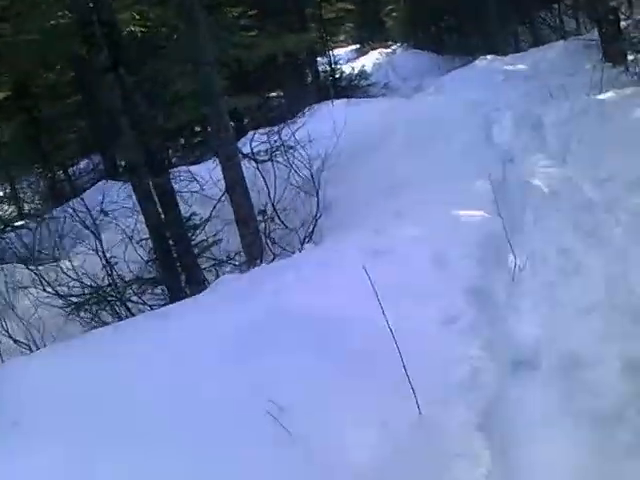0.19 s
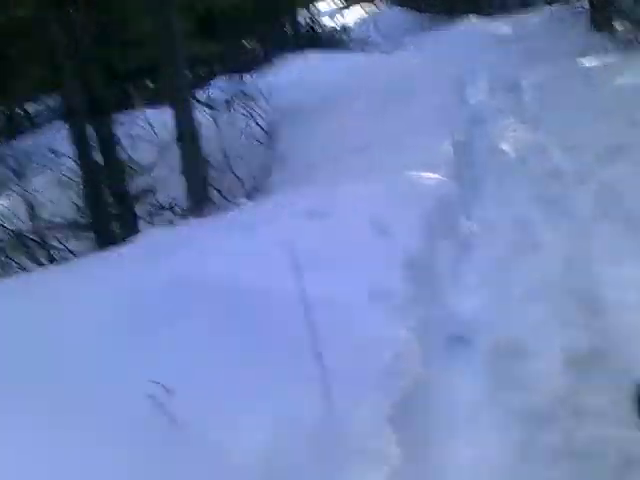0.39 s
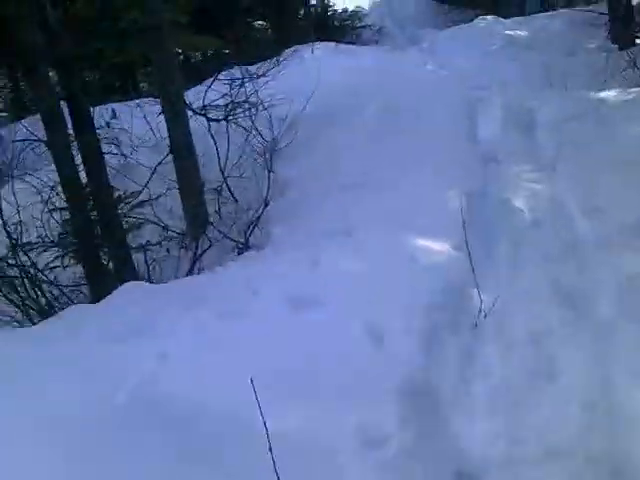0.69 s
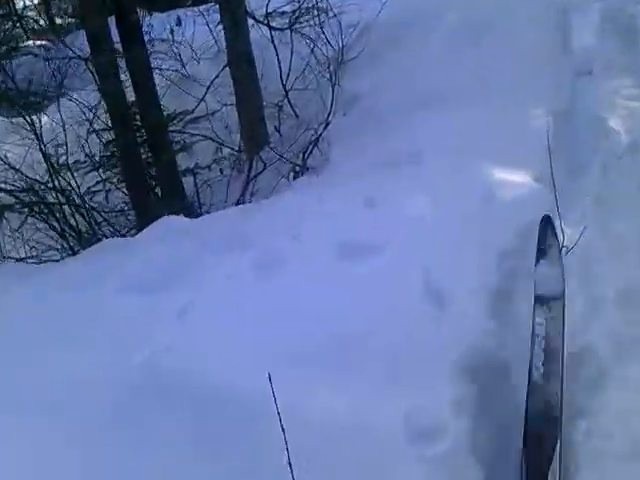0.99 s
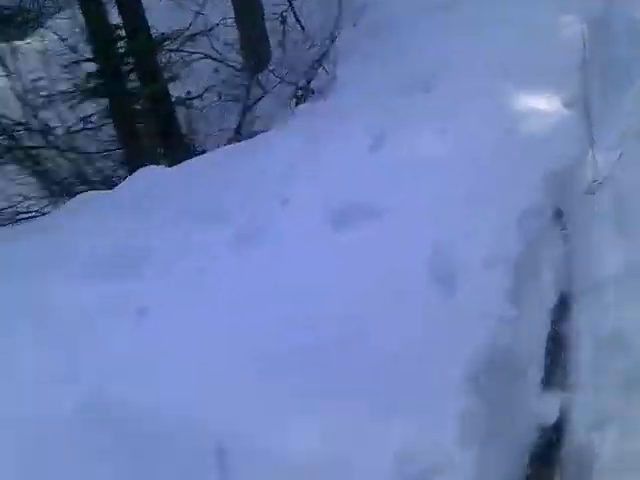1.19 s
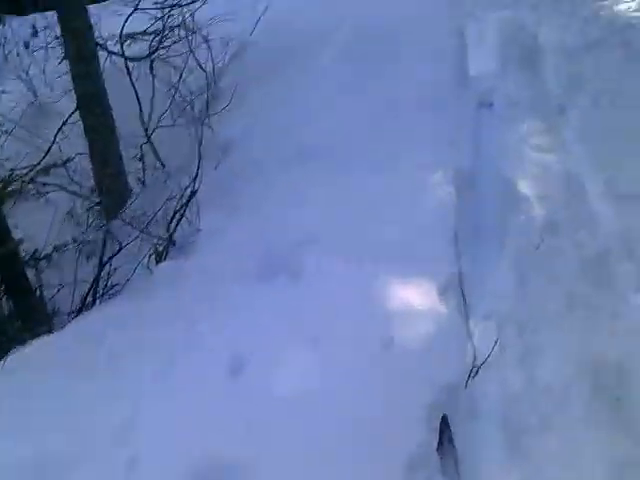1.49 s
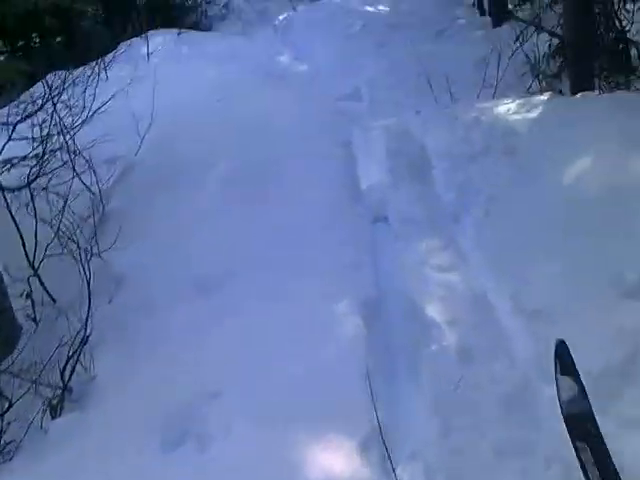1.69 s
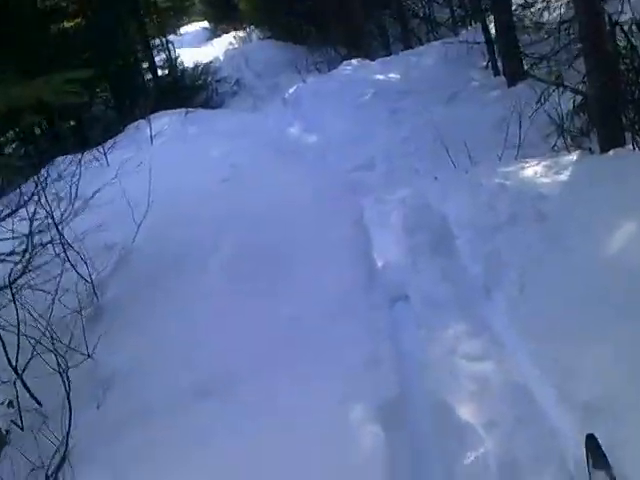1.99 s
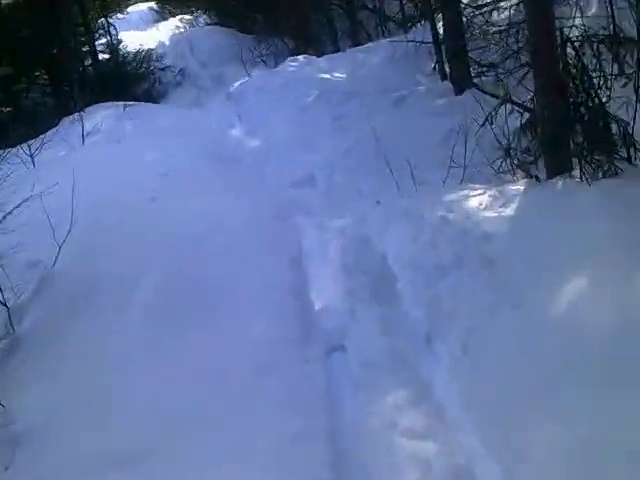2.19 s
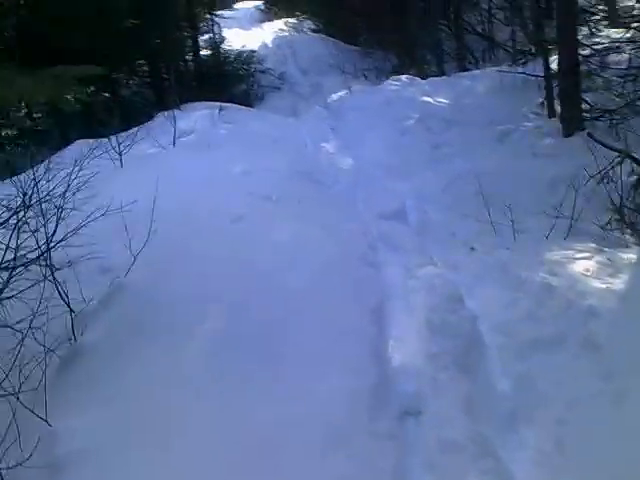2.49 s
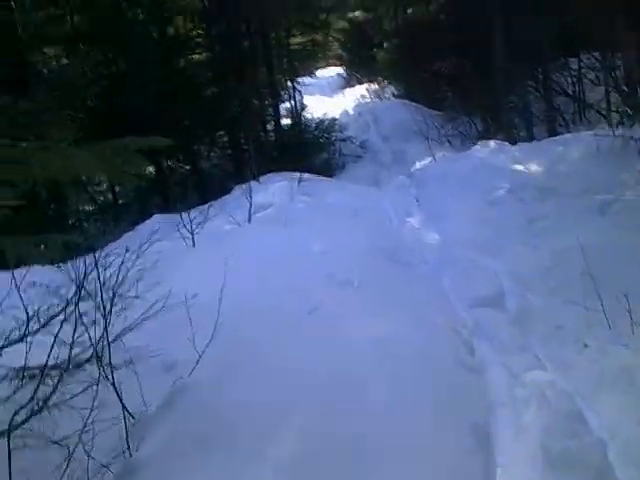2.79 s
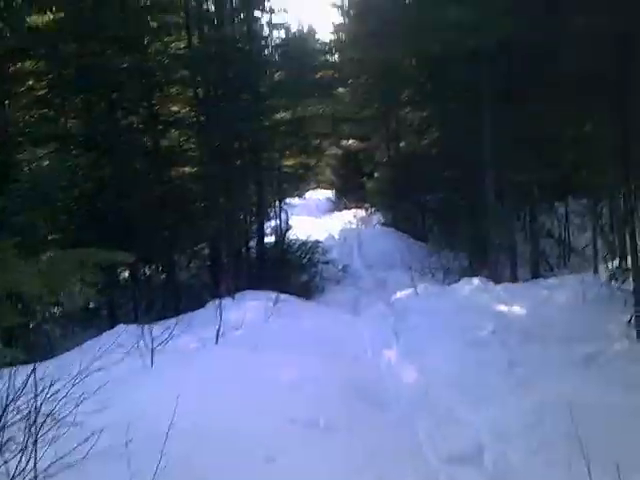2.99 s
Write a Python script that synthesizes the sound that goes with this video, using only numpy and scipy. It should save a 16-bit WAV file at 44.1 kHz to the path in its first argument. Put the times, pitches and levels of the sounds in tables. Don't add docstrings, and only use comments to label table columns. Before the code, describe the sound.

A skier strides through soft snow: hard hollow knocks early, quieter crumbling and a few taps midway, cracks near two seconds, then the hardest knock near the end; dry, close, muffled body-worn microphone outdoors.

```python
import sys
import numpy as np
from scipy import signal
from scipy.fft import rfft, irfft
from scipy.io import wavfile
from scipy.ndimage import uniform_filter1d, minimum_filter1d

SR = 44100
rng = np.random.default_rng(int(sys.argv[2]) if len(sys.argv) > 2 else 0)


def waveform_to_disk(signal):
    frames = np.transpose(np.atleast_2d(signal))
    scaled = np.clip(frames, -1, 1) * 32767
    samples = np.round(scaled).astype(np.int16)
    wavfile.write(sys.argv[1], SR, samples)


def elevation(decibels):
    levels = np.asarray(decibels, float)
    return 10 ** (levels / 20)


N = 136710
T = np.arange(N) / SR

# freq_hz, gain_db
CASE_GAIN = [(150, -20.5), (420, -5), (800, -0.5), (1300, -3), (2400, -13.5), (3500, -37.5), (4600, -56),
             (5500, -100)]
# freq_hz, width_hz, gain_db
CASE_RINGS = [(509, 140, -1.5), (659, 34, 5.5), (800, 67, -0.5), (904, 60, 1.5), (1092, 88, 4),
              (1233, 70, 1.5), (1584, 600, -7), (2170, 82, -19.5), (3330, 270, 10.5)]
# time_s, level_db
SWAY_LEVEL = [(0.0, -30.5), (0.17, -42), (0.21, -30), (0.28, -38), (0.31, -27.5), (0.37, -25.5),
              (0.59, -29), (0.65, -39.5), (1.14, -29), (1.18, -17.5), (1.33, -34.5), (1.41, -34),
              (1.5, -39.5), (2.19, -28.5), (2.62, -34), (2.86, -29), (2.94, -31.5), (3.1, -33.5)]
# freq_hz, gain_db
SWAY_COLOUR = [(4, -2), (12, -1.5), (30, -11), (60, -19.5), (120, -25), (250, -31.5), (500, -33.5),
               (2500, -120)]
# start_s, peak_db, pitch_hz
JOLTS = [(0.305, -19.5, 109.7), (.319, -15, 122), (.399, -18, 131.2), (0.749, -31, 108.4), (.8, -29, 150),
         (1.029, -24.5, 151), (1.171, -18.5, 197.5), (1.207, -18, 86.6), (1.22, -23.5, 108.8),
         (1.34, -26.5, 151.8), (2.029, -26.5, 109.2), (2.549, -27, 197), (2.816, -15, 130),
         (1.257, -19, 130), (2.851, -25, 70), (1.317, -23, 22)]
# time_s, level_db
GLIDE_LEVEL = [(0.0, -47.5), (0.28, -38.5), (0.4, -33), (0.44, -39.5), (0.55, -45.5), (0.72, -43.5),
               (1.08, -36.5), (1.5, -40.5), (2.11, -40.5), (2.19, -44.5), (2.66, -33), (3.1, -37.5)]
# start_s, length_s, level_db
RUSTLES = [
    (0.342, 0.0067, -19.5),
    (1.2, 0.013, -33),
    (2.101, 0.026, -27),
    (2.16, 0.024, -27.5),
    (2.55, 0.02, -28.5),
    (2.674, 0.0032, -23),
    (2.709, 0.0039, -28.5),
    (2.749, 0.0061, -24.5),
    (2.757, 0.0065, -17.5),
]
# start_s, length_s, level_db, treble_db
CRUNCHES = [(-.01, 0.036, -25, 3.5), (0.336, 0.049, -21.5, -3), (0.437, 0.04, -16.5, -3),
            (0.484, 0.06, -31, 7), (0.542, 0.032, -35, 1), (0.691, 0.056, -38, 9.5),
            (0.765, 0.049, -34.5, 12), (0.966, 0.011, -32.5, 5.5), (1.154, .085, -29.5, 1),
            (1.257, 0.027, -52, 11), (1.407, 0.052, -32, 15.5), (1.505, 0.048, -40, 17),
            (1.816, 0.039, -34.5, -4), (1.845, 0.047, -29.5, -7), (1.925, 0.056, -19.5, 3.5),
            (2.106, 0.058, -32, 3), (2.221, 0.018, -33.5, 1.5), (2.254, 0.031, -42, 23),
            (2.3, 0.015, -34.5, 15), (2.426, 0.067, -28.5, -14), (2.529, 0.018, -35, -3),
            (2.55, 0.057, -32.5, -5.5), (2.675, 0.021, -35.5, 16), (2.744, 0.057, -30.5, 0.5),
            (2.356, 0.054, -35, -7), (2.898, 0.058, -32.5, 0.5), (3.003, 0.03, -34.5, -2.5),
            (0.883, 0.064, -43, 8)]
# start_s, peak_db, pitch_hz
LUMPS = [(0.088, -28, 1240), (0.616, -31, 1090), (0.687, -29, 1030), (0.701, -34, 1050), (0.715, -22, 850),
         (0.727, -29, 626), (0.745, -26, 790), (0.776, -20.5, 1430), (0.786, -37, 504),
         (0.796, -24.5, 1300), (0.804, -26, 611), (0.812, -18, 654), (0.857, -26, 850), (0.887, -24, 810),
         (0.911, -28, 744), (0.925, -27, 1200), (1.075, -30, 807), (1.335, -26, 517), (1.422, -27, 1140),
         (1.506, -25, 1410), (1.541, -44, 783), (1.808, -33, 1060), (1.82, -24.5, 659), (2.105, -27, 1110),
         (2.119, -24, 1190), (2.303, -22, 1320), (2.398, -27, 860), (2.434, -20.5, 1320),
         (2.762, -23, 1080), (2.988, -17.5, 1270), (3.034, -24, 1050)]
# start_s, peak_db, ring_hz, edge_db, snap_db
KNOCKS = [
    (.231, -10, 924, -13.5, -7),
    (.288, 1, 1062, 3, 3),
    (.3895, -6, 910, -9, -8.5),
    (.455, 5, 980, 1.5, 6),
    (.821, -14, 513, -5, -14),
    (1.970, -3, 481, -6.5, -7),
    (2.179, -9.5, 1016, -12, -10.5),
    (2.217, -3, 800, -10.5, -20),
    (2.23, -11, 1010, -2, -11),
    (2.817, 5.5, 1087, 5.5, 8),
]
# start_s, peak_db, ring_hz, edge_db, snap_db
TAPS = [
    (.474, 9.5, 916, -9.5, -9),
    (.960, -1.5, 1176, 1, -2.5),
    (1.2567, 4, 800, -17, -20),
    (2.622, -2, 916, -5, -15.5),
    (2.696, -5, 700, -10.5, -14.5),
]
# start_s, peak_db, ring_hz, edge_db, snap_db
MORE_KNOCKS = [(.255, -15.5, 900, -18, -19), (.365, -11.5, 900, -19, -5), (.396, -11.5, 983, -9, -15),
               (.436, -12.5, 900, -3, -9), (.492, -13, 711, -5, -7), (.506, -12, 960, -4.5, -4.5),
               (.588, -15.5, 766, -19, -16), (1.17, -11.5, 1125, -19, -6), (1.62, -23.5, 1190, -9, -8),
               (1.671, -20.5, 916, -5, -12), (1.777, -24.5, 1240, -15.5, -8), (1.859, -14, 885, -9.5, -15.5),
               (1.948, -14.5, 870, 0.5, -6), (1.955, -7, 896, -3.5, -1.5), (1.9749, -3.5, 668, -19, -7.5),
               (2.206, -18.5, 906, -1, -10), (2.365, -21, 960, -9, -10), (2.466, -16.5, 795, -4.5, -15),
               (2.52, -17, 1196, -17, -9.5), (3.006, -18.5, 700, -4.5, -13.5)]
# start_s, peak_db, ring_hz, edge_db, snap_db
REBOUNDS = [
    (.2936, -8, 650, -10, -12),
    (.4599, -3, 850, -14, -14),
    (.4797, -10, 1000, -14, -14),
    (.9671, -16, 900, -2, -12),
    (1.2596, -10, 485, -14, -25),
    (1.2632, -16, 1080, -12, -20),
    (2.8213, 4, 800, -4, -3),
]
# freq_hz, gain_db
EDGE_RINGS = [(1530, 1.5), (1950, 3.5), (2400, -1)]
# freq_hz, width_hz, gain_db
STRAP_RINGS = [(1180, 250, 0), (1800, 300, -5), (2350, 300, -4)]
PATCH_EDGES_HZ = [150, 560, 900, 1350, 1900, 2700, 6000]

LEAK_LO_HZ, LEAK_HI_HZ, LEAK_DB, AIR_DB = 6250, 7910, -47.5, -42
JOLT_CYCLES = 1.25
GLIDE_FLICKER_DB, GLIDE_TREBLE_DB, GLIDE_GRIT_DB = 2, 6, -14.5
PATCH_DB, PATCH_PER_S = 2, 28.6
CRUNCH_RISE_S, CRUNCH_FALL_S, CRUNCH_DB, CRUNCH_SWELL_DB = 0.0084, 0.011, -2.5, 1.5
GRAINS_PER_S, GRAIN_SPREAD_DB = 1500, 3
CREAK_START_S, CREAK_LENGTH_S, CREAK_SLIPS_PER_S, CREAK_DB = 0.9435, 0.0125, 585, -22.5
LUMP_CYCLES, LUMP_DB = 9.9, -5
CRUMBS_PER_S, CRUMB_DB, CRUMB_LO_HZ, CRUMB_HI_HZ = 600, -11.5, 603, 1770
KNOCK_T60_S, KNOCK_RATTLE_DB = 0.021, -5.5
TAP_T60_S, TAP_RATTLE_DB = 0.012, -11
MORE_KNOCK_T60_S, MORE_KNOCK_RATTLE_DB = 0.03, -4
REBOUND_T60_S, REBOUND_RATTLE_DB = 0.036, -18
EDGE_T60_S, RATTLE_T60_S, KNOCK_LAG_S = 0.013, 0.05, 0.0008
EDGE_DB, SNAP_DB, KNOCK_DB = 0.5, -0.5, 2.5
LIMIT_AT, LIMIT_S = 1.02, 0.0006


def unit(x):
    return x / np.sqrt(np.mean(x ** 2))


def band(x, hz, width_hz):
    return signal.lfilter(*signal.iirpeak(hz, hz / width_hz, fs=SR), x)


def between(x, lo_hz, hi_hz, order=5):
    return signal.sosfilt(signal.butter(order, [lo_hz, hi_hz], "band", fs=SR, output="sos"), x)


def colour(x, points, size=8192):
    hz, db = np.array(points).T
    bins_hz = np.arange(size // 2 + 1) * SR / size
    db = np.interp(np.log(bins_hz + 1), np.log(hz), db)
    cepstrum = irfft(np.log(elevation(db)))
    cepstrum[1:size // 2] *= 2
    cepstrum[size // 2 + 1:] = 0
    response = irfft(np.exp(rfft(cepstrum)))
    return signal.fftconvolve(x, response)[:len(x)]


def curve(rows):
    return elevation(np.interp(T, *np.array(rows).T))


def walk(rate_hz):
    k = int(SR / rate_hz)
    return unit(uniform_filter1d(uniform_filter1d(rng.standard_normal(N), k), k))


def grains(per_s, spread_db):
    chance, size, sign = rng.random((3, N))
    clicks = (chance < per_s / SR) * elevation(-spread_db * np.log(size + 0.02))
    return unit(clicks * np.sign(sign - 0.5))


def burst(start_s, length_s, level_db, swell_db=0.0):
    t = T - start_s
    hold = elevation(level_db + swell_db * (np.clip(t / length_s, 0, 1) - 0.5))
    rise = np.clip(t / CRUNCH_RISE_S, 0, 1)
    return hold * rise * np.exp(-np.clip(t - length_s, 0, None) / CRUNCH_FALL_S)


def ping(hz):
    t = T[:1024]
    start = (1 - np.exp(-t * hz / 0.66)) ** 2
    return elevation(-60 * t * hz / LUMP_CYCLES) * start * np.sin(2 * np.pi * hz * t)


def add(out, start_s, x):
    i = int(start_s * SR)
    out[..., i:i + x.shape[-1]] += x[..., :N - i]


def case(x):
    rings = sum(elevation(db) * band(x, hz, width_hz) for hz, width_hz, db in CASE_RINGS)
    return colour(x + rings, CASE_GAIN)


def leak(x):
    return elevation(LEAK_DB) * between(x, LEAK_LO_HZ, LEAK_HI_HZ)


def sway():
    rumble = unit(colour(rng.standard_normal(2 * N), SWAY_COLOUR)[N:])
    end_fade = np.clip((T[-1] - T) * 20, 0, 1)
    out = rumble * end_fade * curve(SWAY_LEVEL) * elevation(3 + 2.9 * walk(8.2))
    t = T[:4096]
    for start_s, db, hz in JOLTS:
        x = t * hz / JOLT_CYCLES
        add(out, start_s, elevation(db) * (x < 1) * np.sin(np.pi * x) * np.sin(2 * np.pi * hz * t))
    return out


def glide():
    hiss = rng.standard_normal(N) + elevation(GLIDE_GRIT_DB) * grains(600, 4.4)
    return hiss * curve(GLIDE_LEVEL) * elevation(GLIDE_FLICKER_DB * walk(20) - 3)


def patchy(x):
    return sum(between(x, lo, hi, order=1) * elevation(PATCH_DB * walk(PATCH_PER_S))
               for lo, hi in zip(PATCH_EDGES_HZ, PATCH_EDGES_HZ[1:]))


def snow():
    body, treble = np.zeros(N), np.zeros(N)
    for start_s, length_s, db, treble_db in CRUNCHES:
        shape = burst(start_s, length_s, db + CRUNCH_DB, CRUNCH_SWELL_DB)
        body += shape
        treble += shape * elevation(treble_db)
    treble += sum(burst(*row) for row in RUSTLES)
    crunch = grains(GRAINS_PER_S, GRAIN_SPREAD_DB) * elevation(1.82 * walk(120))
    hiss = glide()
    rustle = rng.standard_normal(N) * elevation(0.95 * walk(150))
    case_rms = np.std(case(rng.standard_normal(N)))
    muffled = case(elevation(-3.5) * patchy(crunch * body + hiss))
    leaked = leak(rustle * (treble + elevation(AIR_DB)) + elevation(GLIDE_TREBLE_DB) * hiss)
    swish = elevation(-26.5) * between(rustle * treble, 1700, 3360)
    swish += elevation(-59.5) * between(rustle * treble, 4800, 5000)
    bright = elevation(-20.5) * between(hiss, 2000, 3540)
    return (muffled + leaked + swish + bright) / case_rms


def creak():
    slips = np.zeros(N)
    slip_s = CREAK_START_S + np.arange(0, CREAK_LENGTH_S, 1 / CREAK_SLIPS_PER_S)
    slips[(SR * slip_s).astype(int)] = 1
    rung = sum(elevation(db) * band(slips, hz, width_hz) for hz, width_hz, db in STRAP_RINGS)
    rung = between(rung, 850, 2300, order=6)
    return elevation(CREAK_DB) * rung / rung.max()


def lumps():
    out, crumbs = np.zeros(N), np.zeros(N)
    for start_s, db, hz in LUMPS:
        add(out, start_s, elevation(db + LUMP_DB + 11) * ping(hz))
    for when, pitch, size in rng.random((2500, 3)):
        start_s = min(when * 2500 / CRUMBS_PER_S, T[-1])
        hz = CRUMB_LO_HZ * (CRUMB_HI_HZ / CRUMB_LO_HZ) ** pitch
        add(crumbs, start_s, elevation(-2.5 * np.log(size + 0.05) - 6 * pitch) * ping(hz))
    crumbs = unit(crumbs) * curve(GLIDE_LEVEL) * elevation(CRUMB_DB + 2 * walk(21))
    return between(out + crumbs, 370, 2800, order=3)


def knock(ring_hz, edge_db, snap_db, ring_t60_s, rattle_db):
    t = T[:4096]
    noise = rng.standard_normal(len(t))

    def fade(t60_s):
        return elevation(-60 * t / t60_s) * (1 - np.exp(-t / 0.00021))

    ring = fade(ring_t60_s) * np.sin(2 * np.pi * ring_hz * t)
    modes = sum(elevation(db) * np.sin(2 * np.pi * hz * t * (1 + 0.037 * noise[k]))
                for k, (hz, db) in enumerate(EDGE_RINGS))
    edge = elevation(EDGE_DB + edge_db) * fade(min(EDGE_T60_S, ring_t60_s)) * modes / 2
    rattle = case(noise * fade(RATTLE_T60_S))
    upper = elevation(-15) * between(noise * fade(0.014), 2700, 3840)
    upper += elevation(-29) * between(noise * fade(0.015), 3100, 5100)
    snap = elevation(SNAP_DB + snap_db + 21) * leak(noise * fade(0.013))
    body = between(ring + edge, 248, 2550) + elevation(rattle_db) * rattle / np.abs(rattle).max()
    return (body + elevation(edge_db) * upper + snap) / 2


def knocks():
    out = np.zeros(N)
    kinds = [(KNOCKS, KNOCK_T60_S, KNOCK_RATTLE_DB), (TAPS, TAP_T60_S, TAP_RATTLE_DB),
             (MORE_KNOCKS, MORE_KNOCK_T60_S, MORE_KNOCK_RATTLE_DB), (REBOUNDS, REBOUND_T60_S, REBOUND_RATTLE_DB)]
    for rows, t60_s, rattle_db in kinds:
        for start_s, db, hz, edge_db, snap_db in rows:
            blow = knock(hz, edge_db, snap_db, t60_s, rattle_db)
            add(out, start_s + KNOCK_LAG_S, elevation(db + KNOCK_DB) * blow)
    return out


def scene():
    return (knocks() + snow() + lumps() + creak() + sway())[None]


def roll_off(x):
    return signal.sosfilt(signal.butter(12, 8400, fs=SR, output="sos"), x)


def record(dry):
    k = int(LIMIT_S * SR)
    gain = minimum_filter1d(LIMIT_AT / np.maximum(np.abs(dry), LIMIT_AT), 3 * k)
    gain = uniform_filter1d(uniform_filter1d(gain, k), k)
    return roll_off(dry * gain)


dry = scene()
out = record(dry)
waveform_to_disk(out)
```